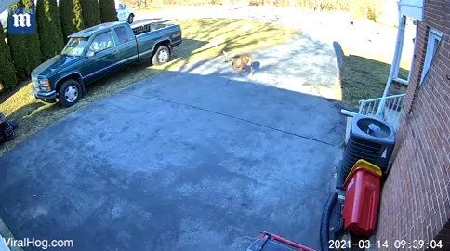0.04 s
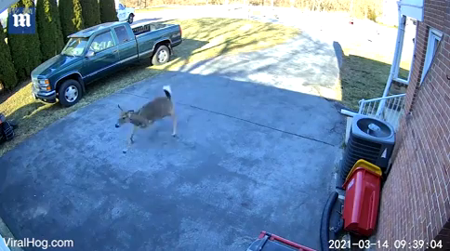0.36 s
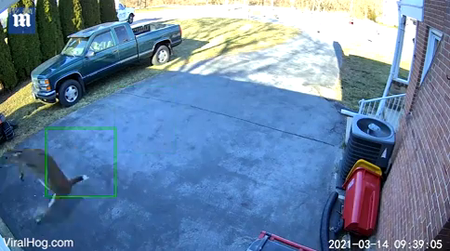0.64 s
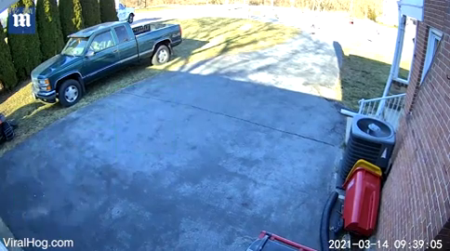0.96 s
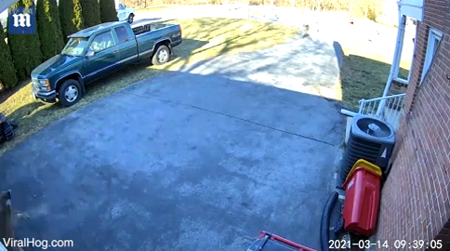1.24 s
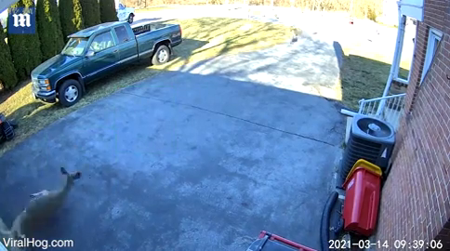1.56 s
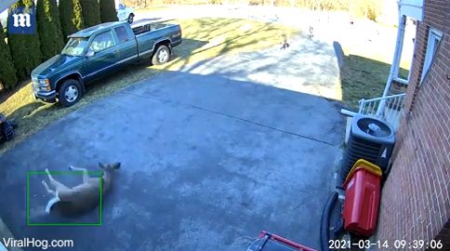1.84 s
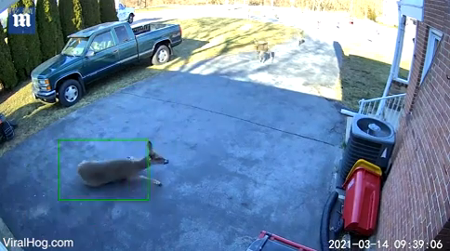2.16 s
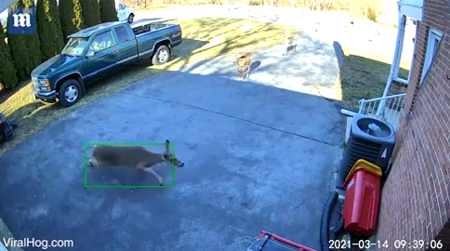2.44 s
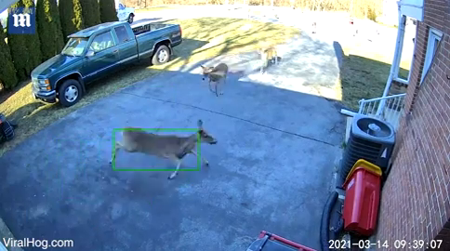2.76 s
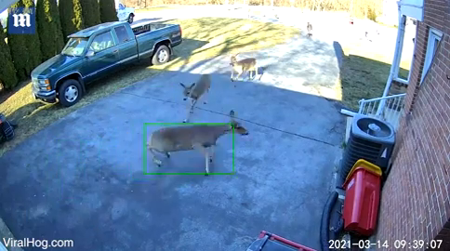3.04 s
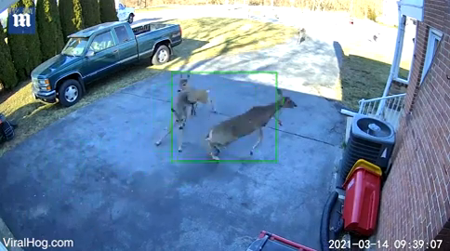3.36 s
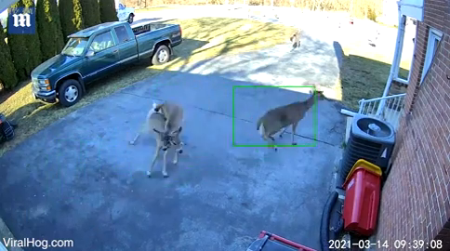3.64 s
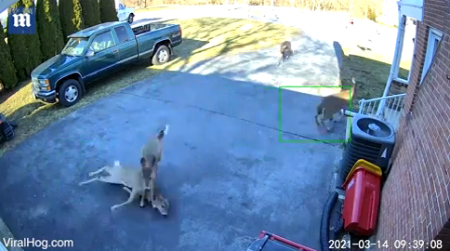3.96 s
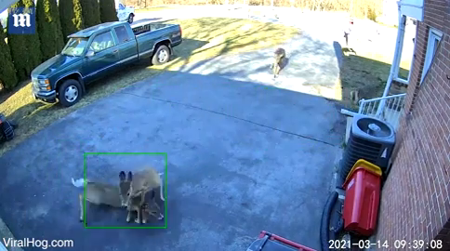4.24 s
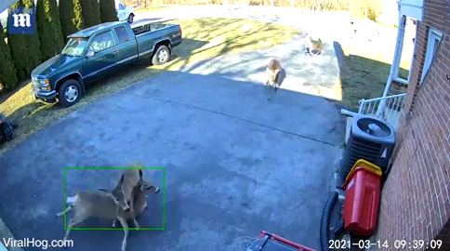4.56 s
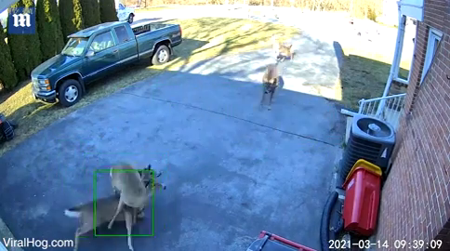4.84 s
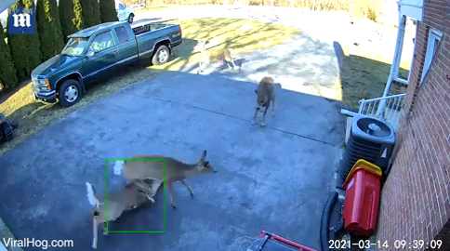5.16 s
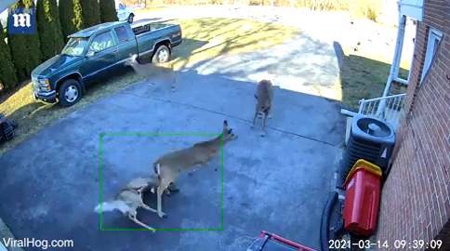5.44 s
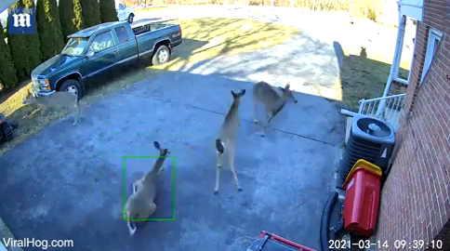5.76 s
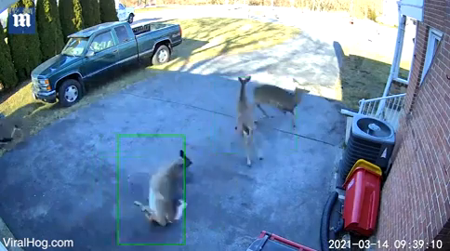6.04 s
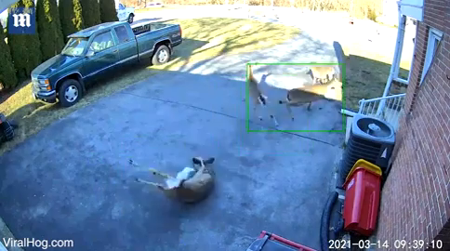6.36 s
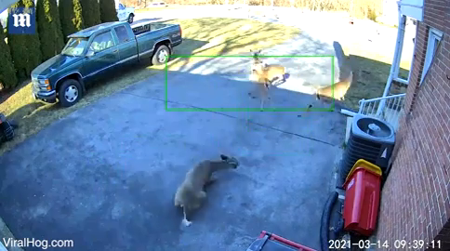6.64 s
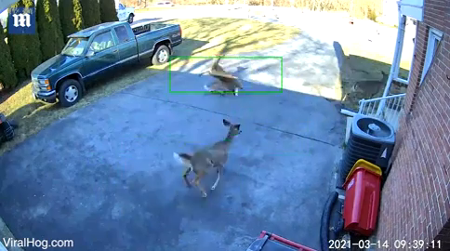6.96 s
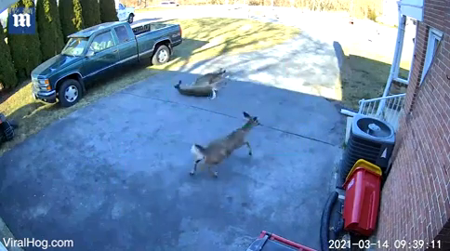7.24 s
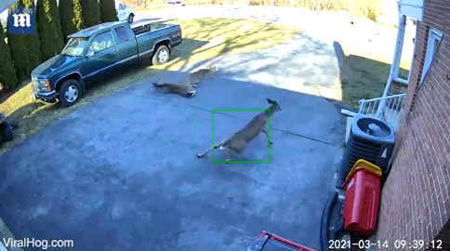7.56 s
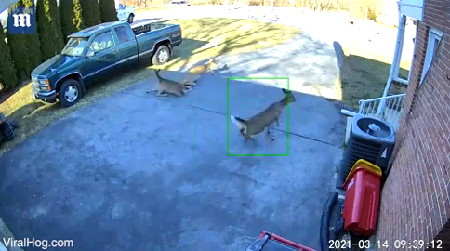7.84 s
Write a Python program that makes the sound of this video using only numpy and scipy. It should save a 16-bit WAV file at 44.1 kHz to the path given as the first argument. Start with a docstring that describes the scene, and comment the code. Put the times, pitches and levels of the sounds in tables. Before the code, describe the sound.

Running hooves, a loud crash and rattle of a metal garage door, then deer knocking and scrabbling as they slip on concrete.

```python
"""A sheet-steel garage door booms and rattles in its tracks as a bolting deer slams into it.
Around the crash, out on the concrete driveway, hooves tap in from a distance, then knock, skid and
squeak on the slab as the deer slip, fall and get up again. House wall and slab add a short echo.
The microphone is a security camera's, on the wall: narrow in band, it overloads on the crash,
which cuts out briefly twice. Faint outdoor air lies underneath."""
import sys
import numpy as np
from scipy import signal
from scipy.fft import rfft, irfft, next_fast_len
from scipy.io import wavfile
from scipy.ndimage import uniform_filter1d, map_coordinates

SR = 44100
rng = np.random.default_rng(int(sys.argv[2]) if len(sys.argv) > 2 else 0)


def generate_wav(sig):
    """Save sig (samples, or channels by samples) to the path in sys.argv[1] as 16-bit PCM at SR."""
    pcm = np.round(np.clip(np.atleast_2d(sig).T, -1, 1) * 32767).astype(np.int16)
    wavfile.write(sys.argv[1], SR, pcm)


N = 357165

# the body hits the door, which then swings against its tracks: start_s, level_db, tilt_db_per_octave
DOOR_BLOWS = [(1.62, -0.5, 2.5), (1.652, 0.5, 3), (1.704, -5, 4), (1.735, 1, 2.5), (1.778, -4, 0.5),
              (1.864, -5, 1), (1.997, -7, 0), (2.153, -6.5, 1), (2.287, -6.5, 2.5), (2.376, -13.5, 1.5),
              (2.426, -12, 1.5), (2.602, -22.5, 1)]
# strong modes of the steel panels: pitch_hz, level_db
PANEL_MODES = [(168, -4), (277, -0.5), (346, 8), (455, 7), (575, -4), (666, -2.5), (918, -14.5),
               (1022, -5.5), (1125, -11)]
# colour of the door's dense ring: frequency_hz, level_db
BOOM_SPECTRUM = [(30, -15.5), (70, -18.5), (115, -5), (270, 1), (450, -5), (1100, -16), (1600, -29.5),
                 (2600, -40), (7500, -55.5)]
# decay of that ring: frequency_hz, t60_s
BOOM_DECAY = [(170, 0.72), (400, 0.84), (1000, 0.59), (9000, 0.17)]
# loose panels as the door settles: start_s, length_s, level_db, pitch_hz
PANEL_SHUDDERS = [(2.648, 0.093, -24, 300.5), (2.765, 0.14, -36, 473.4), (2.91, 0.28, -45.5, 170.6)]
# hooves landing on the driveway: start_s, level_db, pitch_hz, skid_db
HOOF_STEPS = [(0.59, -56, 365, -64), (0.647, -42.5, 388, -54), (0.884, -41.5, 452, -54),
              (0.949, -26.5, 439, -46.5), (1.356, -19.5, 670, -38.5), (1.416, -4.5, 544, -14),
              (3.079, -33, 580, -50), (3.3, -27.5, 786, -40.5), (3.487, -24.5, 803, -36.5),
              (3.716, -22, 586, -37), (3.832, -19, 560, -45), (3.853, -12, 690, -28.5),
              (4.046, -23, 490, -36), (4.203, -11, 470, -27), (4.531, -19, 522, -40), (4.557, -7, 520, -37),
              (4.708, -13, 648, -30.5), (4.761, -18, 423.5, -33), (4.858, -4, 415, -31),
              (4.892, -3, 453, -18), (4.97, -20.5, 670, -35), (5.048, -16, 657.6, -38),
              (5.928, -9.5, 743, -39.5), (6.168, -19.5, 714, -43), (6.216, -31, 556, -51),
              (6.447, -30.5, 362, -43), (6.549, -20.5, 820, -39), (6.818, -23.5, 418, -42),
              (6.847, -27, 417, -51), (6.944, -25.5, 510, -39.5), (6.995, -23.5, 488, -35),
              (7.068, -19.5, 419, -46), (7.142, -23.5, 490, -53), (7.186, -26, 630, -44.5),
              (7.416, -31.5, 364, -38), (7.567, -27, 390, -31), (7.626, -30, 497, -37),
              (7.861, -9.5, 426, -28.5), (7.965, -28.5, 427, -36)]
# flanks and knees hitting the slab: start_s, level_db, pitch_hz
BODY_FALLS = [(4.192, -23.5, 239), (4.842, -15.5, 180), (6.87, -26.5, 207), (7.092, -28, 236.5),
              (7.556, -29, 85.7)]
# legs dragged over the slab: start_s, length_s, level_db, swell_db, hollow_hz, grit_db, rasp_hz
LEG_DRAGS = [(0.708, 0.063, -56.5, 21, 493, -0.5, 1390), (1.108, 0.08, -41, 7, 517, -9.5, 2700),
             (1.21, 0.13, -36.5, -7.5, 640, -3, 1575), (1.336, 0.081, -30.5, 6, 573, -4, 3060),
             (1.407, 0.086, -29.5, -3.5, 456, -5, 4060), (1.495, 0.0552, -50.5, -4, 430, 16.5, 1420),
             (2.921, .13, -54, -9, 757, -13.5, 3670), (3.226, 0.086, -45, 9, 745, -5.5, 2810),
             (3.611, 0.066, -42.5, 11, 573, 1, 2770), (3.81, 0.033, -30, -17, 464, -17, 2750),
             (3.98, 0.081, -38, -6, 700, -5, 2880), (4.088, 0.1, -36, -7, 387, -14.5, 2650),
             (4.325, 0.086, -35, -11, 565, -12, 2260), (4.474, 0.16, -41, 6, 516.7, -21, 2950),
             (4.672, 0.1317, -34, -12, 600, -15, 1930), (5.008, 0.13, -42, -23.5, 690, -3.5, 1300),
             (5.255, 0.08, -57, -1, 520, -6.5, 2180), (5.421, 0.12, -50, -3.5, 780, -5.5, 1697),
             (5.632, 0.087, -37.5, -6.5, 465, -17.5, 1200), (5.729, 0.089, -35.5, -8, 630, -26, 1580),
             (5.941, 0.14, -34, -2.5, 454, -32, 1470), (6.219, 0.024, -44, -9, 540, -33, 1390),
             (6.285, 0.097, -41.5, 8, 650, -15, 2760), (6.54, 0.079, -35.5, -10.5, 616, -18.5, 1380),
             (6.632, 0.04, -29.5, -9.5, 604, -6.5, 2530), (6.736, 0.15, -39.5, 0.5, 474, -18, 1130),
             (7.102, 0.11, -42.5, -16, 518, -6.5, 1450), (7.229, 0.072, -45.5, 2, 544, -6, 4440),
             (7.337, .19, -41.5, 8.5, 630, -5.5, 1280), (7.568, 0.13, -40, -10.5, 418, -14, 3880),
             (7.773, 0.058, -44, -2, 438, -14, 1300)]
# a hoof's edge catching on the slab: start_s, level_db, pitch_hz
HOOF_CLACKS = [(0.974, -35.5, 1340), (3.718, -34.5, 2920), (4.886, -33, 1910), (5.021, -40.5, 3760),
               (5.987, -38, 2030), (6.951, -49.5, 3980), (7.102, -50, 4500), (7.482, -31.5, 1220),
               (7.678, -35, 2220)]
# skidding hooves that squeak: start_s, length_s, level_db, pitch_hz
HOOF_SQUEAKS = [(2.385, 0.02, -40, 3670), (3.472, 0.03, -52, 2900), (4.51, 0.16, -54.5, 2730),
                (5.131, 0.061, -56.5, 2125), (6.367, 0.017, -42.5, 2786), (7.247, 0.007, -39.5, 3990),
                (7.567, 0.02, -37, 2400), (7.896, 0.063, -49, 2640)]
# the dull weight behind a hoof: frequency_hz, level_db
WEIGHT_SPECTRUM = [(30, -13.5), (80, -25), (170, 2), (320, 6), (1500, -42)]
# sand rasping under a hoof; also colours the door's chatter: frequency_hz, level_db
GRIT_SPECTRUM = [(300, -17.5), (1100, 6), (4000, -1.5), (6500, -7), (7800, -30.5)]
# echo off house wall and driveway: frequency_hz, t60_s
YARD_DECAY = [(500, 0.23), (9000, 0.023)]
# outdoor air: frequency_hz, level_db
AIR_SPECTRUM = [(30, -16), (360, -3.5), (900, -7.5), (9000, -22.5)]
# the crash cuts out briefly: start_s, end_s, gain_db
DROPOUTS = [(1.722, 1.733, -28), (1.851, 1.857, -16)]
# treble roll-off of the camera's microphone: frequency_hz, gain_db
MIC_RESPONSE = [(5500, 0), (8500, -4), (9800, -16), (11200, -35)]
# stereo side signal against the middle: frequency_hz, gain_db
SIDE_RESPONSE = [(2000, -70), (4000, -13), (10000, -7)]

PANEL_T60_S, CHATTER_DB, CHATTER_T60_S = 0.29, -36, 0.7
SLAP_DELAY_S, SLAP_DB, SLAP_PER_DB = .04, -4.5, 1.5  # panels slap back, most after a heavy blow
HOOF_HZ, HARD_DB_PER_OCTAVE = 520, 6  # a knock above this pitch means harder contact
CLICK_DB, CLICK_PER_DB, SNAP_DB, SNAP_PER_DB = -21, .3, -19, 0.4  # heavy landings are sharper
CLOP_CYCLES, CLOP_CYCLES_PER_DB = 0.67, -0.066  # a light hoof swells for more cycles than a heavy one
BRUSH_S, SKID_S, SKID_SWELL_DB, SKID_GRIT_DB = 0.0099, .038, -13, -22.5
WEIGHT_DB, WEIGHT_DB_PER_OCTAVE = -10, -5  # the lower a sliding hoof rings, the more weight is on it
HORN_OVER_HOLLOW, HORN_RATIO = 4.9, 1.28  # pitch ratios: horn to hollow, upper horn mode to lower
HORN_DB, HORN_UPPER_DB, HORN_Q, CLACK_T60_S = 6, -5, 20, .06
CATCHES_PER_S, CATCH_DECAY_S, STEADY_RUB = 60, .007, .9
APPROACH_S, TAPS_PER_S, TAP_DB, TAP_DB_PER_S = (0.04, .55), 10.5, -73, 10


def garage_door():
    """Each blow rings a few strong panel modes in a dense boom; hinges and rollers chatter on."""
    out, t = np.zeros(N), np.arange(SR * 5 // 4) / SR
    n = len(t)
    slaps = [(s + SLAP_DELAY_S, db + SLAP_DB + SLAP_PER_DB * db, tilt) for s, db, tilt in DOOR_BLOWS]
    for s, db, tilt in DOOR_BLOWS + slaps:
        boom = coloured(decaying_noise(BOOM_DECAY, n), BOOM_SPECTRUM)
        modes = np.zeros(n)
        for pitch_hz, mode_db in PANEL_MODES:
            envelope = amp(mode_db + rng.normal(0, 0.42) - 60 * t / PANEL_T60_S)
            modes += envelope * np.sin(2 * np.pi * (pitch_hz * t + rng.random()))
        ring = patchy(boom, depth_db=5) + amp(-9.5) * unit(modes)
        ring = filtered(ring, lambda hz: amp(tilt * np.log2(np.clip(hz, 150, 3000) / 400)))
        hardness = amp(3 * tilt)  # hard contacts start at once with a crack, soft ones swell
        attack = 1 - np.exp(-t * hardness ** 4 / 0.013)
        crack = 1 + 1.3 * hardness * np.exp(-t / 0.029)
        ring *= attack * crack
        ring *= amp(0.93 * wobble(n, 30))  # loose panels beat against each other
        ring /= np.std(ring[:SR // 20])
        rattle = coloured(noise(n), GRIT_SPECTRUM) + noise(n) / 2
        chatter = rattle * catches(n) * amp(CHATTER_DB - 60 * t / CHATTER_T60_S)
        add(out, s, amp(db) * (ring + chatter))
    return out


def panel_shudders():
    """A loose panel swells, buzzes around one pitch and dies away."""
    out = np.zeros(N)
    for s, length_s, db, hz in PANEL_SHUDDERS:
        n = int(length_s * SR)
        add(out, s, amp(db) * rough_tone(n, hz, width_hz=hz / 10) * signal.windows.hann(n))
    return out


def knocks():
    """A hoof lands with a hollow clop, a dry click and a snap of its edge; a body thumps far lower."""
    out, t = np.zeros(N), np.arange(SR // 5) / SR
    n = len(t)
    contact = 1 - np.exp(-t / .0015)
    for s, db, pitch_hz, *_ in HOOF_STEPS + BODY_FALLS:
        rise = t * max(pitch_hz, HOOF_HZ / 2) / (CLOP_CYCLES + CLOP_CYCLES_PER_DB * db)
        clop = (rise * np.exp(1 - rise)) ** 2 * np.sin(2 * np.pi * pitch_hz * t)
        bright = filtered(noise(n), lambda f: resonance(f, centre_hz=5900, q=3.5))
        click_db = CLICK_DB + hardness_db(pitch_hz) + CLICK_PER_DB * db
        click = patchy(coloured(bright, GRIT_SPECTRUM), depth_db=21.5) * amp(click_db - 60 * t / 0.011)
        thud = coloured(noise(n), WEIGHT_SPECTRUM) * amp(-18 - 60 * t / 0.079)
        snap = unit(np.gradient(noise(n))) * amp(SNAP_DB + SNAP_PER_DB * db - 60 * t / 0.004)
        add(out, s, amp(db) * yard_echo(clop + contact * (click + snap + thud)))
    return out


def scuffs():
    """A hoof brushes the slab just before it lands, then skids; dragged legs scrape on for longer."""
    out = np.zeros(N)
    for s, _, pitch_hz, skid_db in HOOF_STEPS:
        grit_db = SKID_GRIT_DB + hardness_db(pitch_hz)
        skid = slide(SKID_S, SKID_SWELL_DB, pitch_hz, grit_db, HORN_OVER_HOLLOW * pitch_hz)
        add(out, s - BRUSH_S, amp(skid_db) * skid)
    for s, length_s, db, swell_db, hollow_hz, grit_db, rasp_hz in LEG_DRAGS:
        add(out, s, amp(db) * slide(length_s, swell_db, hollow_hz, grit_db, rasp_hz))
    return out


def slide(length_s, swell_db, hollow_hz, grit_db, rasp_hz):
    """A sliding hoof catches and slips: each jolt rings its hollow and its horn and crushes sand."""
    t = np.arange(int(length_s * SR) + SR // 10) / SR
    n = len(t)
    ramp_db = swell_db * (np.minimum(t / length_s, 1) - .5)
    release_db = -60 * np.maximum(t - length_s, 0) / 0.1
    pressure = amp(ramp_db + release_db) * (1 - np.exp(-t / 0.0076))
    force = catches(n)

    def jolts():
        return noise(n) * force * amp(2 * wobble(n, 1400))

    hollow = filtered(jolts(), lambda f: resonance(f, hollow_hz, q=2) * resonance(f, hollow_hz, q=1.4))
    grit = coloured(filtered(jolts(), lambda f: horn(f, rasp_hz)), GRIT_SPECTRUM)
    hollow, grit = patchy(hollow, depth_db=6), patchy(grit, depth_db=10)
    weight = patchy(coloured(jolts(), WEIGHT_SPECTRUM), depth_db=4)
    weight_db = WEIGHT_DB + WEIGHT_DB_PER_OCTAVE * np.log2(hollow_hz / HOOF_HZ)
    return yard_echo(pressure * (amp(3) * hollow + amp(grit_db) * grit + amp(weight_db) * weight))


def catches(n):
    """Force of a slipping contact: sudden uneven jolts that die quickly, over a steady rub."""
    hits = (rng.random(n) < CATCHES_PER_S / SR) * (.5 + rng.random(n))
    jolts = signal.lfilter([1], [1, -np.exp(-1 / (CATCH_DECAY_S * SR))], hits)
    return unit(STEADY_RUB + jolts)


def horn(f, hz):
    """Response of a hoof's horn wall: two narrow modes on a broad rasp."""
    modes = resonance(f, hz, HORN_Q) + amp(HORN_UPPER_DB) * resonance(f, hz * HORN_RATIO, HORN_Q)
    return resonance(f, hz, q=1.6) * resonance(f, hz, q=.5) + amp(HORN_DB) * modes


def hardness_db(pitch_hz):
    """Extra click and grit of a contact that rings at this pitch."""
    return HARD_DB_PER_OCTAVE * np.log2(pitch_hz / HOOF_HZ)


def hoof_clacks():
    """A sharp catch on the slab crushes sand and rings the horn."""
    out, t = np.zeros(N), np.arange(SR // 10) / SR
    for s, db, hz in HOOF_CLACKS:
        crunch = coloured(filtered(noise(len(t)), lambda f: horn(f, hz)), GRIT_SPECTRUM)
        add(out, s, amp(db) * yard_echo(crunch * amp(-60 * t / CLACK_T60_S)))
    return out


def hoof_squeaks():
    """Fast stick and slip drives a pair of narrow, rough resonances."""
    out = np.zeros(N)
    for s, length_s, db, hz in HOOF_SQUEAKS:
        n = int(length_s * SR)
        low, high = (rough_tone(n, hz * ratio, width_hz=300) for ratio in (1, HORN_RATIO))
        squeak = (low + amp(HORN_UPPER_DB) * high) * signal.windows.tukey(n)
        add(out, s, amp(db) * yard_echo(squeak))
    return out


def distant_hoofbeats():
    """Uneven, gritty ticks that grow as the first deer runs up toward the microphone."""
    out = np.zeros(N)
    for s in np.arange(*APPROACH_S, 1 / TAPS_PER_S):
        tick = slide(SKID_S / 2, SKID_SWELL_DB, HOOF_HZ, grit_db=-2, rasp_hz=HORN_OVER_HOLLOW * HOOF_HZ)
        late_s = rng.random() / TAPS_PER_S / 2
        add(out, s + late_s, amp(TAP_DB + TAP_DB_PER_S * s + 2 * rng.normal()) * tick)
    return out


def yard_echo(sound):
    """The sound plus its echo: slab and walls answer differently from every spot on the driveway."""
    response = decaying_noise(YARD_DECAY, SR // 3)
    response *= amp(-11) / np.linalg.norm(response)
    response[0] += 1  # direct path to the microphone
    return signal.fftconvolve(sound, response)


def outdoor_air():
    """Faint, steady air over the driveway."""
    return amp(-72) * coloured(noise(N), AIR_SPECTRUM)


def amp(db):
    """Decibels to gain."""
    return 10 ** (np.asarray(db) / 20)


def unit(x):
    """x at rms 1."""
    return x / np.sqrt(np.mean(x ** 2) + 1e-20)


def noise(shape):
    """White noise."""
    return rng.standard_normal(shape)


def along(points, hz):
    """(frequency_hz, value) points read on a log axis."""
    frequencies, values = np.transpose(points)
    return np.interp(np.log(hz + 1), np.log(frequencies + 1), values)


def filtered(x, response):
    """x through a response given as a function of frequency."""
    n = x.shape[-1]
    padded = next_fast_len(n + SR // 8)
    return irfft(rfft(x, padded) * response(np.fft.rfftfreq(padded, 1 / SR)), padded)[..., :n]


def coloured(x, spectrum):
    """x shaped by a spectrum, at rms 1."""
    return unit(filtered(x, lambda hz: amp(along(spectrum, hz))))


def resonance(f, centre_hz, q):
    """Causal band-pass response."""
    damping = 1j * f * centre_hz / q
    return damping / (centre_hz ** 2 - f ** 2 + damping)


def wobble(n, rate_hz):
    """A smooth random curve of n samples, rate_hz knots a second."""
    return map_coordinates(noise(int(n * rate_hz / SR) + 4), [np.arange(n) * rate_hz / SR])


def rough_tone(n, hz, width_hz, wander=.015):
    """A narrow band of noise whose pitch wanders, at rms 1."""
    phase = 2 * np.pi * np.cumsum(hz * (1 + wander * wobble(n, 21))) / SR
    return unit(wobble(n, width_hz) * np.sin(phase) + wobble(n, width_hz) * np.cos(phase))


def decaying_noise(decay, n):
    """Noise whose frequencies each die at their own speed."""
    hz, t, frames = signal.stft(noise(n), SR, nperseg=256)
    fade = amp(-60 * t / along(decay, hz)[:, None])
    return signal.istft(frames * fade, SR, nperseg=256)[1][:n]


def patchy(x, depth_db):
    """Patches that come and go: random gains about 250 Hz wide and 60 ms long, with deep valleys between them."""
    frames = signal.stft(x, nperseg=512)[2]
    field = noise(frames.shape)
    for _ in range(2):
        field = uniform_filter1d(uniform_filter1d(field, size=2, axis=0), size=9, axis=1)
    shaped = frames * amp(depth_db * np.minimum(unit(field), 1))  # deep valleys, capped peaks
    shaped *= np.linalg.norm(frames, axis=0) / (np.linalg.norm(shaped, axis=0) + 1e-20)  # level holds
    return unit(signal.istft(shaped, nperseg=512)[1][:len(x)])


def add(track, start_s, sound):
    """Mix a sound in at start_s."""
    part = track[round(start_s * SR):][:len(sound)]
    part += sound[:len(part)]


def scene():
    """Door, deer and air all reach one microphone on the wall."""
    door = garage_door() + panel_shudders()
    deer = distant_hoofbeats() + knocks() + hoof_clacks() + scuffs() + hoof_squeaks()
    return np.tile(door + deer + outdoor_air(), (2, 1))


def record(dry):
    """The level dips twice; the camera saturates and keeps a narrow band; the treble spreads a little."""
    mono, t = dry.mean(axis=0), np.arange(N) / SR
    for start_s, end_s, db in DROPOUTS:
        inside = (t > start_s) & (t < end_s)
        mono = mono * amp(db * uniform_filter1d(inside.astype(float), size=50))
    ceiling, knee, top_hz = .71, 8, 11170
    saturated = mono / (1 + np.abs(mono / ceiling) ** knee) ** (1 / knee)
    mid = filtered(saturated, lambda hz: amp(along(MIC_RESPONSE, hz)))
    spread = decaying_noise([(1000, .035)], SR // 32)
    side = signal.fftconvolve(mid, spread / np.linalg.norm(spread))[:N]
    side = filtered(side, lambda hz: amp(along(SIDE_RESPONSE, hz)))
    return filtered(np.array([mid + side, mid - side]), lambda hz: hz < top_hz)


dry = scene()
out = record(dry)
generate_wav(out)
```